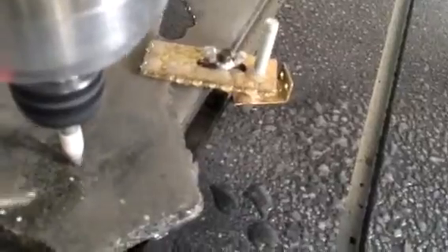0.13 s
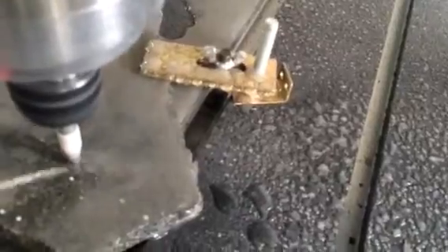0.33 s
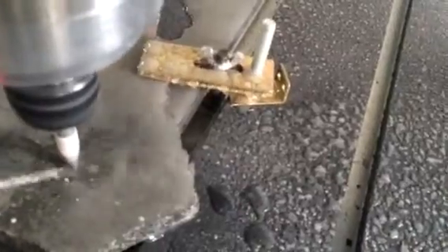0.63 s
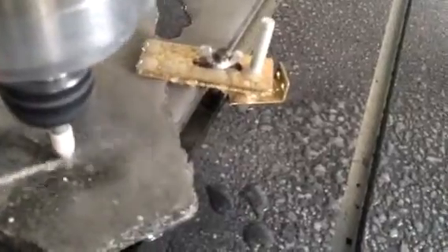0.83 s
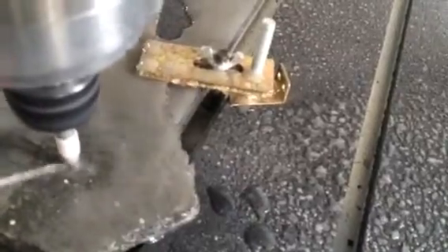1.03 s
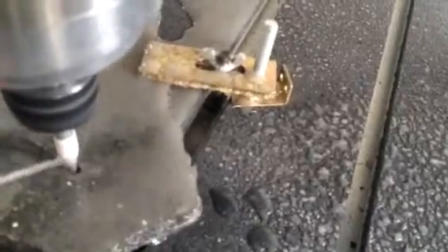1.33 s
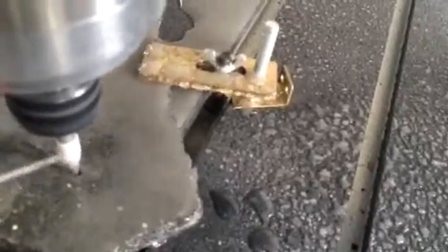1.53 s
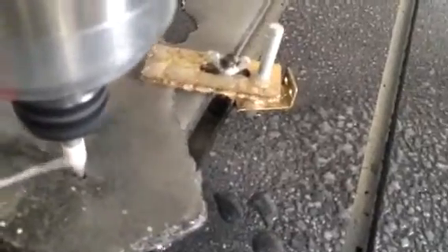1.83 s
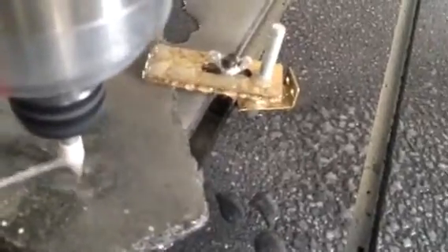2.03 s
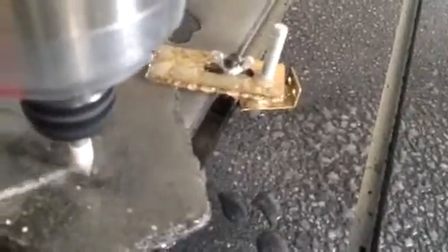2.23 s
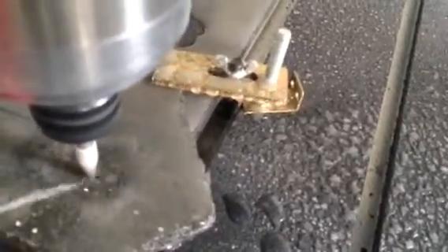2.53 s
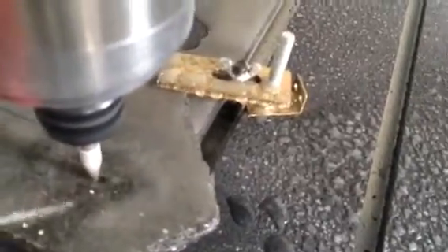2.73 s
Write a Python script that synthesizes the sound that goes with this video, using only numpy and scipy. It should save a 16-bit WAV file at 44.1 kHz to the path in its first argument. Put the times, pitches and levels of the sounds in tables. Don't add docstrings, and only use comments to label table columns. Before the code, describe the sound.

A stone-cutting spindle whines steadily throughout, close, in a slightly reverberant workshop. A loud grinding bite is already under way at the start; more harsh, rattling buzzes with low slab boom come near 0.5, 1.1, 1.7 and 2.3 seconds. Between them, weaker plunges and scrapes begin around 0.3, 0.8, 1.4, 2.0 and 2.7, with brief axis groans. Gritty spray hiss, thin high whistle and pump rumble continue.

```python
import sys
import numpy as np
from scipy import signal
from scipy.fft import rfft, irfft
from scipy.io import wavfile
from scipy.ndimage import uniform_filter1d, minimum_filter1d

SR = 44100
rng = np.random.default_rng(int(sys.argv[2]) if len(sys.argv) > 2 else 0)


def level_to_linear(level):
    exponent = np.asarray(level, float) / 20
    return 10 ** exponent


def transcribe(signal):
    frames = np.atleast_2d(signal).T
    limited = np.clip(frames, -1, 1)
    pcm = np.round(limited * 32767).astype(np.int16)
    wavfile.write(sys.argv[1], SR, pcm)


N = 127449

# start in seconds, length in seconds, entry level in dB, bottoming level in dB, skim level in dB.
PLUNGES = [
    (0.278, 0.09, -23.5, -27, -32),
    (0.824, 0.084, -23.5, -21.5, -29.5),
    (1.409, 0.084, -23.5, -29.5, -27.5),
    (2.033, 0.086, -21.5, -18.5, -28),
    (2.692, 0.0866, -23.5, -19, -25.5),
]
# start in seconds, length in seconds, level in dB, early slip in Hz, late slip in Hz.
BITES = [
    (-.015, .14, -15, 38.8, 30.36),
    (0.507, 0.14, -17, 25.4, 49.5),
    (1.074, 0.13, -16, 54.3, 29.2),
    (1.668, 0.153, -16.5, 34.6, 21.55),
    (2.285, 0.17, -16.5, 61.8, 27.9),
]
# multiple of the turn, level in dB.
IDLE_ORDERS = [(1, 0.5), (2, 2), (3, -10), (4, -5), (5, -4), (6, -9.5), (7, 2), (8, 1), (9, -2), (10, -1),
               (11, 0.5), (12, -7), (13, -13.5), (14, -8.5)]
SHALLOW_ORDERS = [(1, 12), (2, 5), (3, -15), (4, -1.5), (5, -11.5), (6, 3), (7, -3.5), (8, 7.5), (9, 0),
                  (10, 4.5), (11, 0.5), (12, -1.5), (13, -13.5), (14, -19.5)]
DEEP_ORDERS = [(1, 4.5), (2, -1.5), (3, -10.5), (4, -17), (5, -6.5), (6, -19), (7, -10), (8, -9), (9, 0),
               (10, 1.5), (11, 4.5), (12, 0.5), (13, -5.5), (14, -8)]
# frequency in Hz, level in dB.
IDLE_TOP = [(6000, -15.5), (8000, -12), (10000, -18.5), (12500, -22.5), (15300, -32)]
SHALLOW_TOP = [(6000, -33.5), (7600, -5), (9000, -26.5), (12000, -39), (15300, -20)]
DEEP_TOP = [(6000, -7), (6800, -15.5), (8400, -8), (10000, -9), (11500, -14.5), (12400, -60), (15300, -19)]
# frequency in Hz, density in dB per Hz.
IDLE_GRIT = [(500, -2.5), (1000, -4.5), (2400, -1.5), (3200, -0.5), (4600, -10), (5300, -8), (8000, -4),
             (15400, -10)]
SHALLOW_GRIT = [(500, -17.5), (2200, -20), (2900, -7.5), (4200, -9), (4900, -18), (7500, -19.5),
                (11000, -17.5), (15400, -28)]
DEEP_GRIT = [(500, -14), (2400, -12.5), (4300, -1), (4800, 6.5), (5000, -27.5), (9500, -18.5), (12200, -9),
             (15400, -28)]
# frequency in Hz, density in dB per Hz.
RUMBLE_SPECTRUM = [(15, -52), (25, -24), (86, 0), (253, -13), (344, -3), (395, -8.5), (461, -8),
                   (568, -37.5), (700, -11.5), (910, -15), (1540, -120)]
# frequency in Hz, level under the loudest neighbour in dB.
MASK_LIMIT = [(1000, -60), (1700, -19), (4600, -18), (5000, -14.5), (8000, -11.5), (11500, -9),
              (12200, -5.2), (15000, -4.6)]

T_S = np.arange(N) / SR
TURN_HZ = 399.6
TURN_PHASE = 2 * np.pi * TURN_HZ * T_S
ORDER = np.arange(1, 39)[:, None]
SLIP_IDLE_HZ, SLIP_PLUNGE_HZ, SLIP_SKIM_HZ = 46, 16, 72
PLUNGE_RISE_S, PLUNGE_FALL_S, SKIM_FALL_S = 0.014, 0.007, 0.0067
BITE_RISE_S, BITE_FALL_S = 0.025, 0.016
BEAT_IDLE, BEAT_CUT = 0.52, 0.32


def rms_one(x):
    return x / np.sqrt(np.mean(x ** 2) + 1e-20)


def at_hz(points, hz):
    point_hz, point_db = np.transpose(points)
    return np.interp(np.log(hz), np.log(point_hz), point_db)


def drift(rate_hz, count=1):
    r = np.exp(-2 * np.pi * rate_hz * 20 / SR)
    white = rng.standard_normal((count, N // 20 + 2002))
    slow = signal.lfilter([1], [1, -2 * r, r * r], white)[:, 2000:]
    return np.repeat(slow / slow.std(axis=1, keepdims=True), 20, axis=1)[:, :N]


def smooth(x, lag_s):
    r = np.exp(-1 / (max(lag_s, 1e-4) * SR))
    return signal.lfilter([1 - r], [1, -r], x)


def coloured(spectrum, patchy_db):
    hz = np.maximum(np.fft.rfftfreq(N, 1 / SR), 1)
    low_hz, top_hz = spectrum[0][0], spectrum[-1][0]
    white = rfft(rng.standard_normal(N)) * level_to_linear(at_hz(spectrum, hz)) * (hz > low_hz) * (hz < top_hz)
    place = 2 * np.log2(hz / low_hz)
    count = int(2 * np.log2(top_hz / low_hz)) + 2
    flicker = level_to_linear(patchy_db * drift(13, count))
    total = 0
    for k in range(count):
        total = total + irfft(white * np.clip(1 - abs(place - k), 0, 1), N) * flicker[k]
    return rms_one(total)


def stroke(start_s, length_s, rise_s, fall_s):
    t = T_S - start_s
    return np.clip(t / rise_s, 0, 1) * np.exp(-np.clip(t - length_s, 0, None) * 2.55 / fall_s)


def knock(at_s):
    return np.exp(-((T_S - at_s) / 0.024) ** 2)


def plunge(start_s, length_s, entry_db, bottom_db, skim_db, end_s):
    entry = level_to_linear(entry_db) * knock(start_s + 0.03)
    bottoming = level_to_linear(bottom_db) * knock(start_s + length_s - 0.01)
    sag = level_to_linear(entry_db - 7)
    body = (entry + bottoming + sag) * stroke(start_s, length_s, PLUNGE_RISE_S, PLUNGE_FALL_S)
    skim = level_to_linear(skim_db) * stroke(start_s, end_s - start_s, PLUNGE_RISE_S, SKIM_FALL_S)
    return np.maximum(body, skim)


def contact():
    shallow, deep = 0, 0
    for row in PLUNGES:
        next_bite_s = min([bite[0] for bite in BITES if bite[0] > row[0]] + [9])
        shallow = shallow + plunge(*row, next_bite_s + 0.044)
    for start_s, length_s, level_db, *_ in BITES:
        deep = deep + level_to_linear(level_db) * stroke(start_s, length_s, BITE_RISE_S, BITE_FALL_S)
    return shallow, deep


def chatter_slip():
    way = []
    for s, *_ in PLUNGES:
        way += [(s - 0.03, SLIP_IDLE_HZ), (s + 0.0078, SLIP_PLUNGE_HZ), (s + 0.13, SLIP_SKIM_HZ)]
    for s, length_s, _, early_hz, late_hz in BITES:
        end_s = s + length_s
        way += [(s + 0.0294, early_hz), (end_s - 0.04, late_hz), (end_s + 0.0461, SLIP_IDLE_HZ)]
    return np.interp(T_S, *np.transpose(sorted(way))) + 9 * drift(19.16)[0]


def throb(slip_hz, depth):
    uneven = np.clip(1 + 0.3 * drift(18)[0], 0, 2)
    return np.exp(depth * np.cos(2 * np.pi * np.cumsum(slip_hz) / SR) * uneven)


def workshop(x):
    t = np.arange(SR // 2) / SR
    t60_s = 0.29
    tail = rng.standard_normal(len(t)) * level_to_linear(-60 * t / t60_s) * (t > 0.004)
    return level_to_linear(-22) * signal.fftconvolve(x, tail / np.sqrt(np.sum(tail ** 2)))[:N]


def rumble(load):
    return level_to_linear(-38) * (1 + 7 * smooth(load, 0.01)) * coloured(RUMBLE_SPECTRUM, 2.0)


def drive_whistle():
    return level_to_linear(-42.5 + 2.8 * drift(5.9)[0]) * np.sin(2 * np.pi * 6999 * T_S)


def axis_turn():
    swell = 0
    for start_s, length_s, *_ in PLUNGES:
        swell = swell + np.exp(-((T_S - start_s - length_s - 0.02) / 0.036) ** 2)
    return level_to_linear(-28.5) * swell * np.sin(2 * np.pi * 808 * T_S)


def slab(load):
    mode_hz, ring_s = 390, 0.02
    lead = SR // 10
    load = np.r_[np.full(lead, load[0]), load]
    turn = 2 * np.pi * TURN_HZ * np.arange(-lead, N) / SR
    drive = smooth(load, 0.0049) * np.cos(turn + 1.33)
    r, w = np.exp(-1 / (ring_s * SR)), 2 * np.pi * mode_hz / SR
    b = (1 - r * r) / 2
    return 2.44 * signal.lfilter([b, 0, -b], [1, -2 * r * np.cos(w), r * r], drive)[lead:]


def grit(shallow, deep, slip_hz):
    swing = np.cos(TURN_PHASE)
    crushed = level_to_linear(-5) * shallow * coloured(SHALLOW_GRIT, 0.67)
    crushed = crushed + level_to_linear(-6.5) * deep * coloured(DEEP_GRIT, 2.6)
    crushed = crushed * rms_one(np.exp(0.4 * swing) * throb(slip_hz, BEAT_CUT))
    spray = level_to_linear(-35) * rms_one(np.exp(0.55 * swing)) * coloured(IDLE_GRIT, 0.72)
    band = signal.butter(2, [6500, 11000], "band", fs=SR, output="sos")
    bright = signal.sosfilt(band, spray)
    return crushed + spray + bright * (rms_one(throb(slip_hz, BEAT_IDLE)) - 1)


def strengths(low, top):
    gain = level_to_linear(np.r_[np.array(low)[:, 1], at_hz(top, TURN_HZ * np.arange(15, 39))])
    return gain[:, None] / np.sqrt(np.sum(gain ** 2) / 2)


def chatter_comb(idle, cut, phase, slip_hz):
    treble = ORDER > 16
    idle = 0.62 * idle * np.where(treble, rms_one(throb(slip_hz, BEAT_IDLE)), 1)
    cut = cut * np.where(treble, rms_one(throb(slip_hz, BEAT_CUT)), 1)
    slipped = 2 * np.pi * np.cumsum(slip_hz) / SR * np.where(treble, 1.5, 1)
    jitter_s = 1.2e-5 * np.where(ORDER > 13, 1.8, 1) * drift(135)
    scatter = 2 * np.pi * TURN_HZ * ORDER * jitter_s
    wobble = 0.22 * np.sqrt(ORDER / 10) * drift(14.5, 38)
    level = (ORDER >= 7) * (idle + cut) * level_to_linear(2.8 * drift(15.7, 38))
    return (level * np.cos(phase - slipped + scatter + wobble)).sum(axis=0)


def locked_orders(idle, cut, phase):
    upper = ORDER >= 7
    level = idle * np.where(upper, 0.57, 1) + cut * np.where(upper, 0.55, 0.4)
    wobble = 0.59 * np.clip(ORDER - 1.5, 0.3, 3) * drift(15.7, 38)
    return (level * level_to_linear(3.2 * drift(14.5, 38)) * np.cos(phase + wobble)).sum(axis=0)


def spindle(shallow, deep, slip_hz):
    idle = level_to_linear(-28) * strengths(IDLE_ORDERS, IDLE_TOP)
    cut = shallow * strengths(SHALLOW_ORDERS, SHALLOW_TOP) + deep * strengths(DEEP_ORDERS, DEEP_TOP)
    cut = cut * np.where(ORDER > 2, 1, 0.5 * (ORDER > 1))
    phase = ORDER * TURN_PHASE + 0.89 * rng.standard_normal((38, 1))
    return locked_orders(idle, cut, phase) + chatter_comb(idle, cut, phase, slip_hz)


def scene():
    shallow, deep = contact()
    slip_hz = chatter_slip()
    load = level_to_linear(-7) * deep + level_to_linear(-8) * np.sqrt(0.017 * shallow)
    shallow = shallow * level_to_linear(1.8 * drift(31)[0])
    deep = deep * level_to_linear(1.3 * drift(27)[0])
    near = axis_turn() + slab(load) + grit(shallow, deep, slip_hz) + spindle(shallow, deep, slip_hz)
    return (rumble(load) + drive_whistle() + workshop(near) + near)[None]


def masked(x):
    span_hz, cut_hz = 900, 15300
    hz, _, z = signal.stft(x, SR, nperseg=2048, noverlap=1536)
    power = uniform_filter1d(abs(z) ** 2, size=5, axis=1)
    power = uniform_filter1d(power, size=5, axis=2)
    loud = -minimum_filter1d(-power, size=int(span_hz / hz[1]), axis=1)
    limit_db = at_hz(MASK_LIMIT, np.maximum(hz, 1))
    keep = 1.0 * (power > loud * level_to_linear(2 * limit_db)[:, None])
    keep = uniform_filter1d(keep, size=3, axis=2)
    return signal.istft(z * keep * (hz < cut_hz)[:, None], SR, nperseg=2048, noverlap=1536)[1][:, :N]


def roll_off(x):
    return signal.sosfilt(signal.butter(12, 15450, fs=SR, output="sos"), x)


def record(dry):
    mix = masked(0.73 * np.tanh(dry / 0.72))
    return roll_off(mix)


dry = scene()
out = record(dry)
transcribe(out)
```